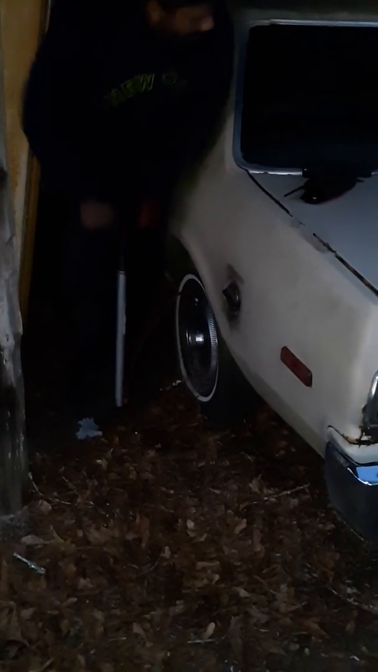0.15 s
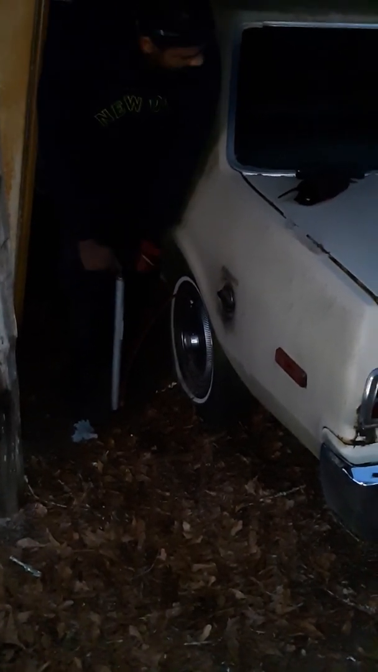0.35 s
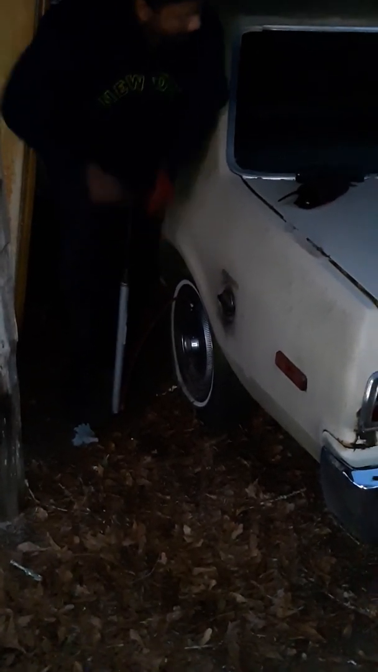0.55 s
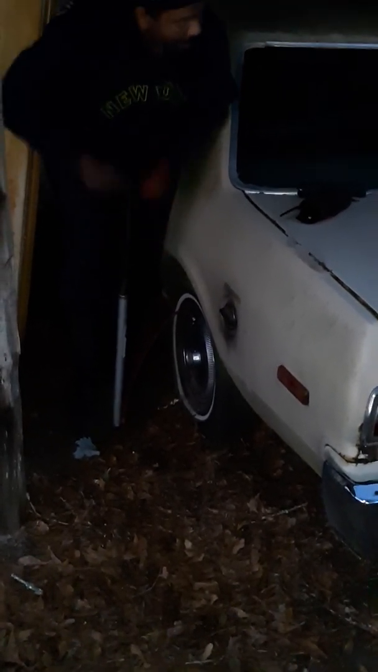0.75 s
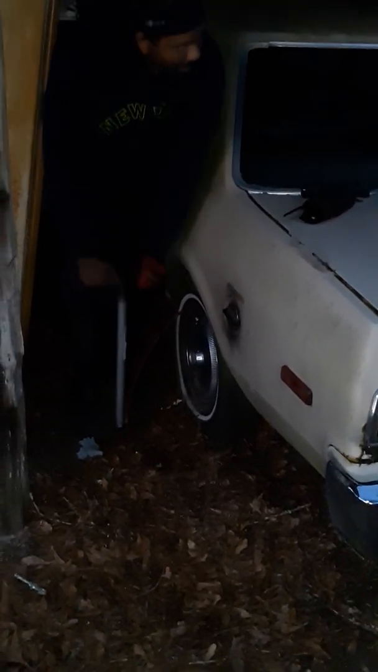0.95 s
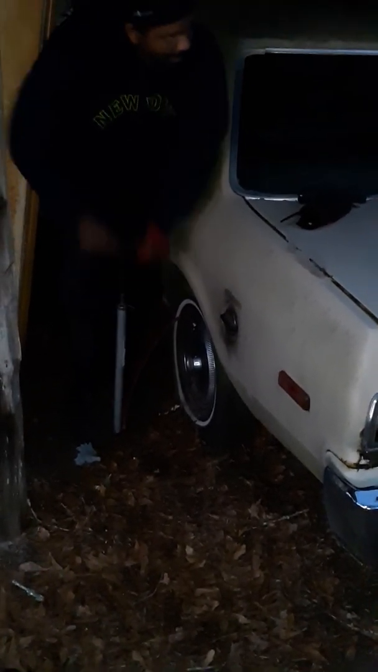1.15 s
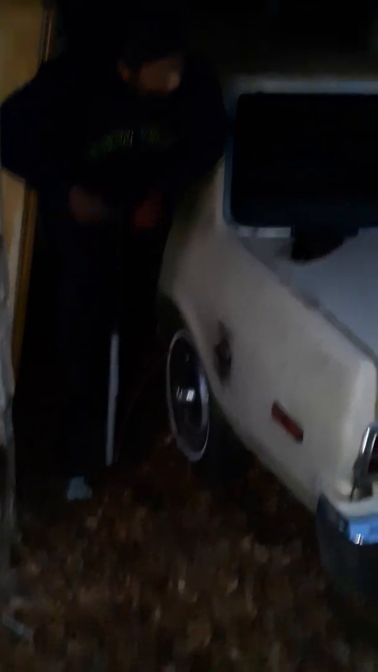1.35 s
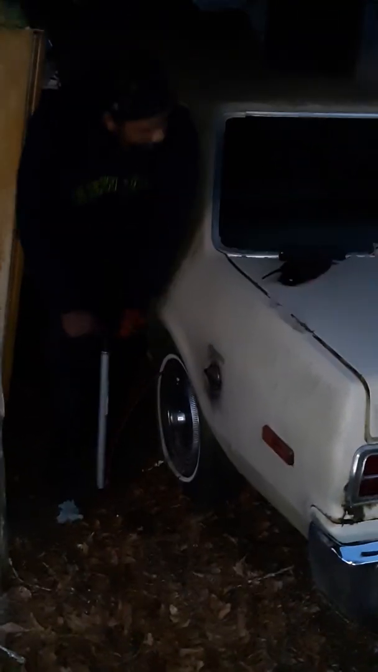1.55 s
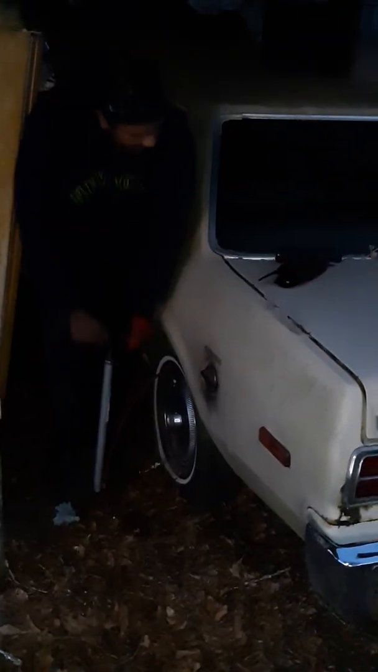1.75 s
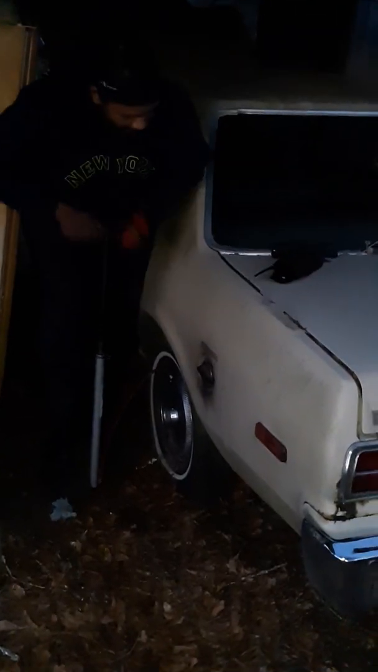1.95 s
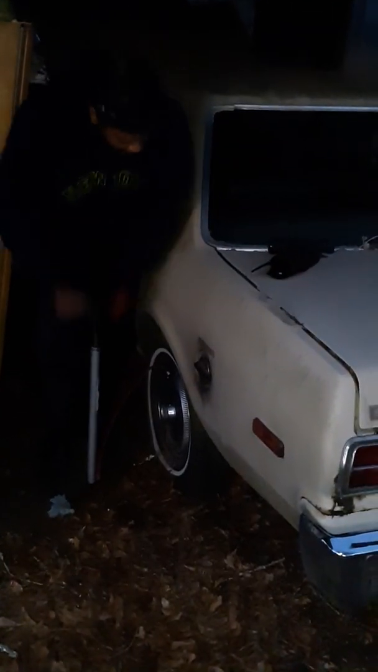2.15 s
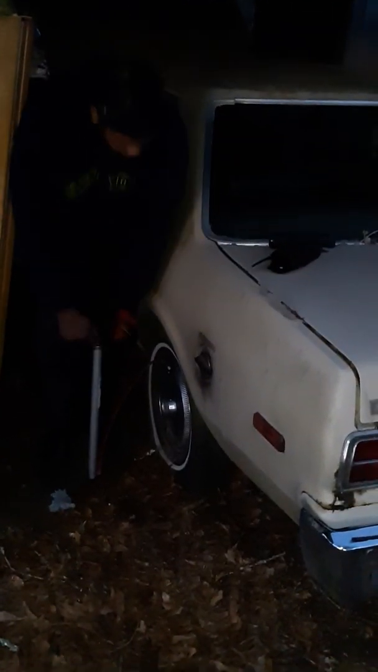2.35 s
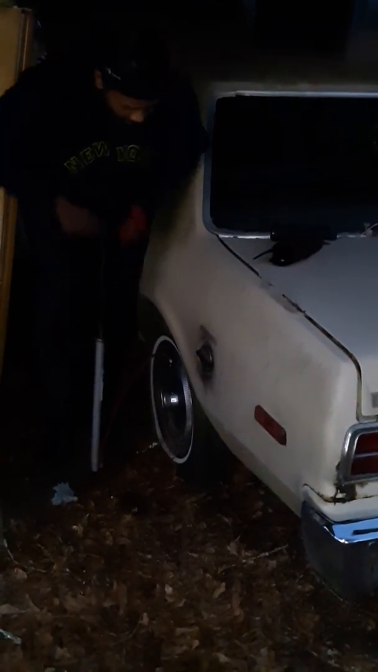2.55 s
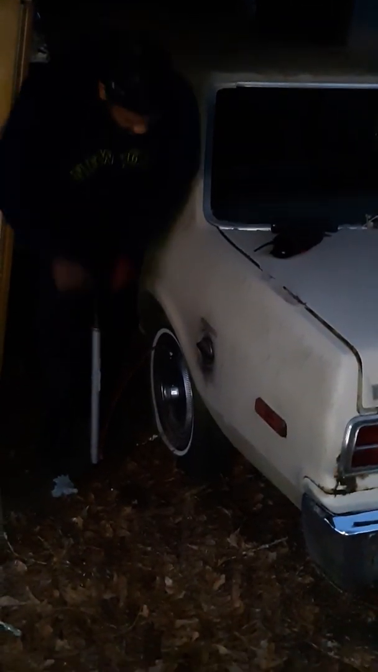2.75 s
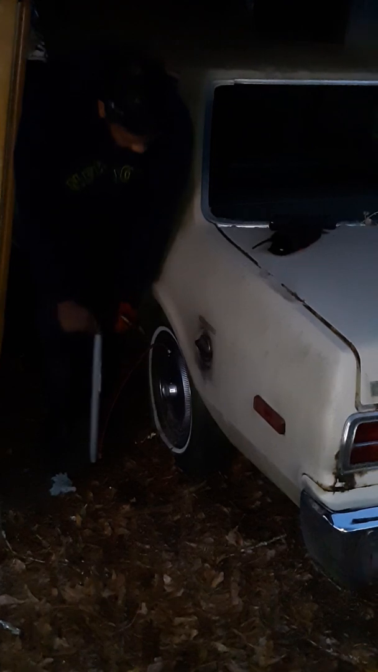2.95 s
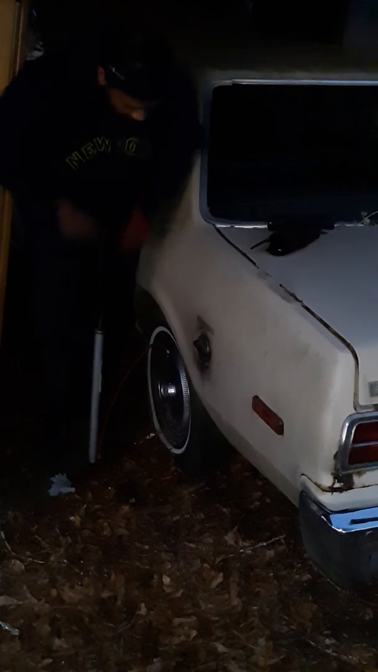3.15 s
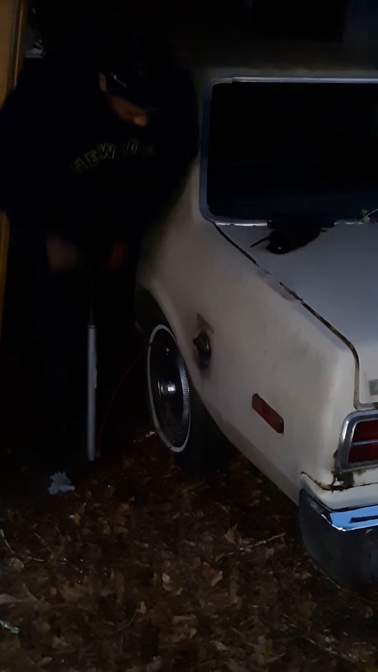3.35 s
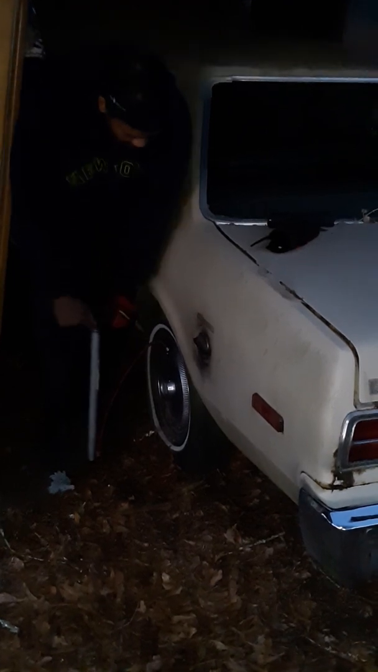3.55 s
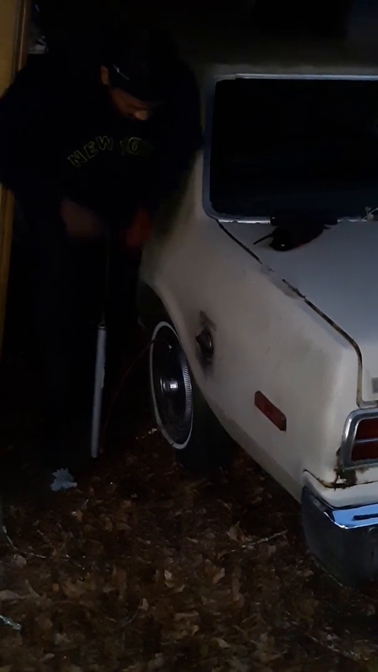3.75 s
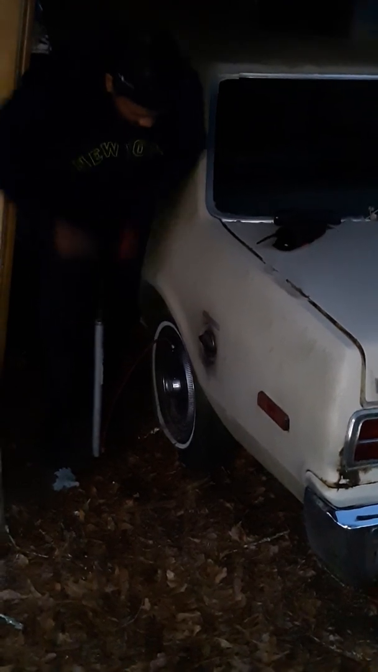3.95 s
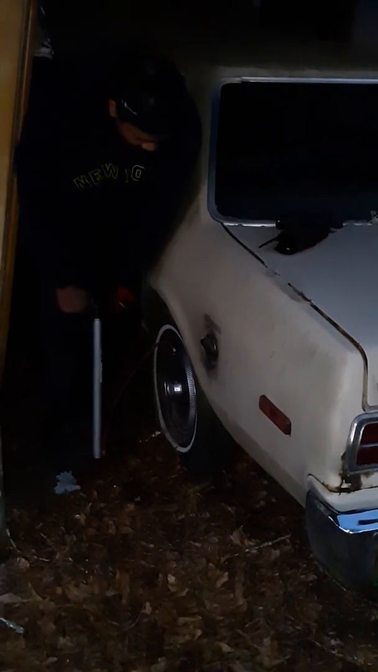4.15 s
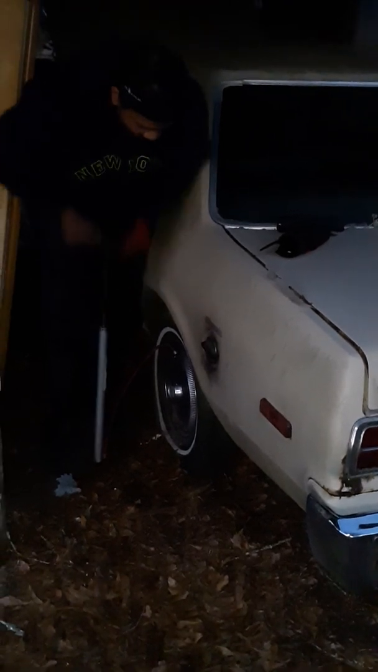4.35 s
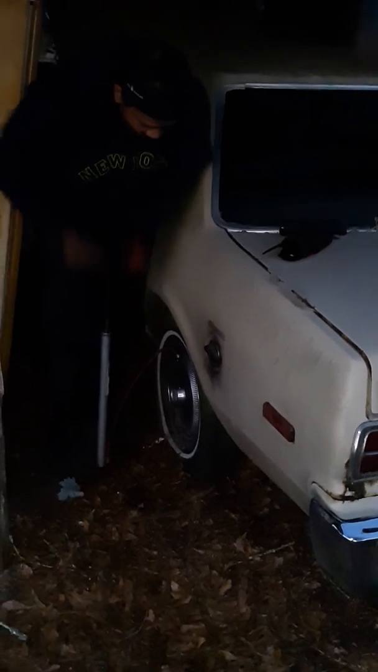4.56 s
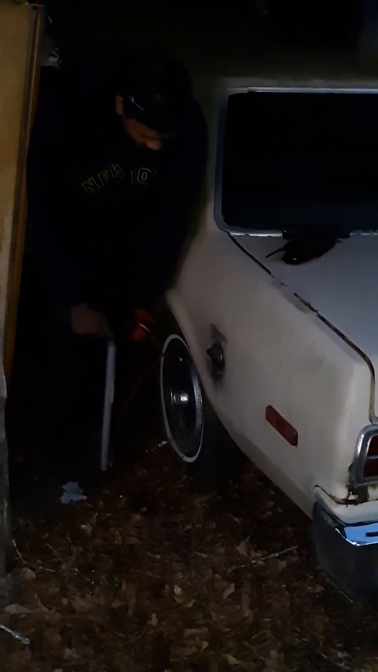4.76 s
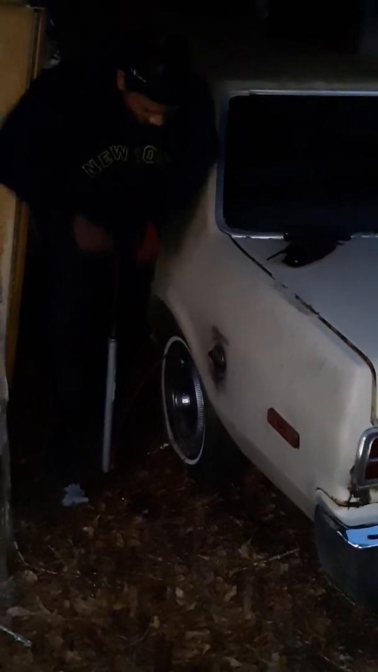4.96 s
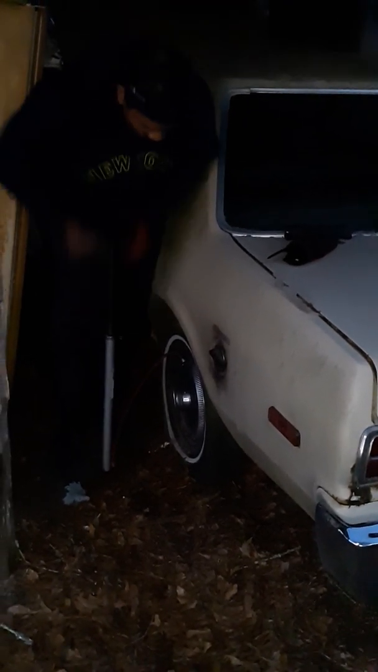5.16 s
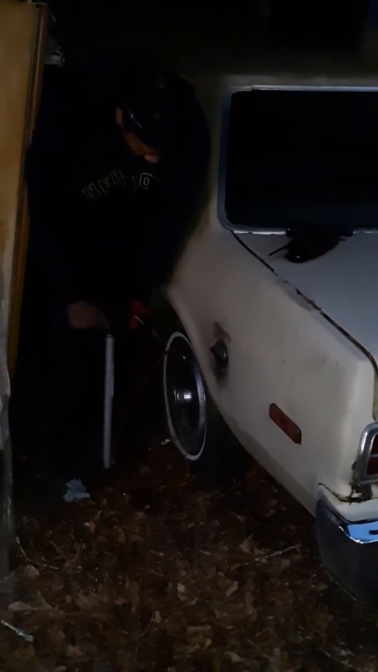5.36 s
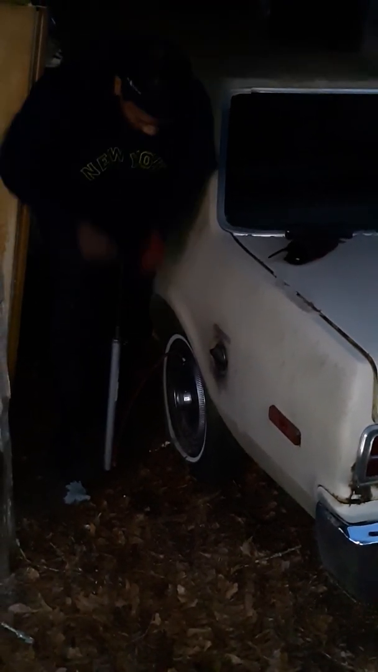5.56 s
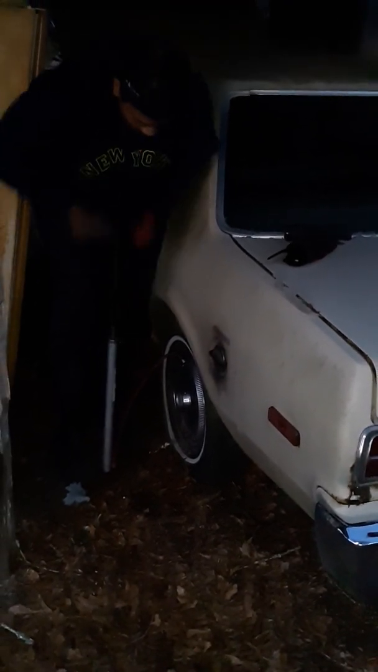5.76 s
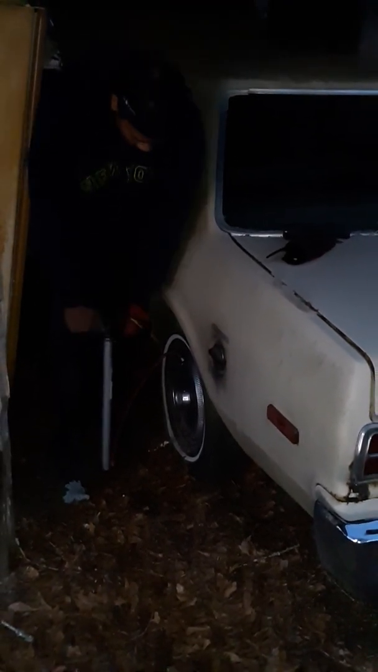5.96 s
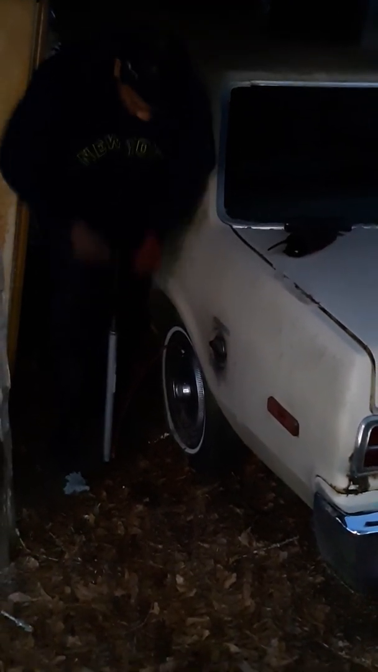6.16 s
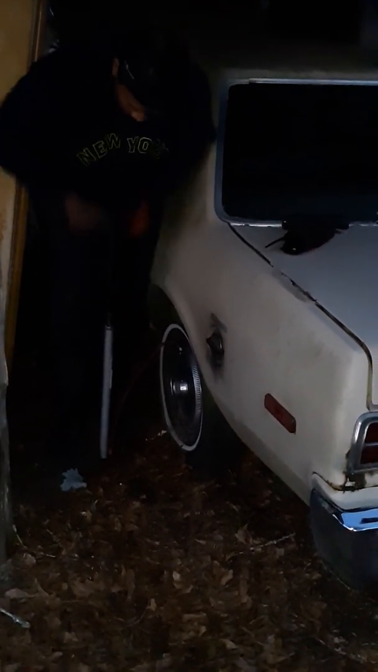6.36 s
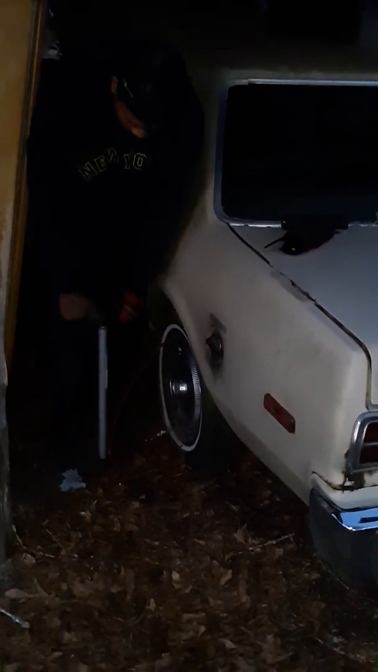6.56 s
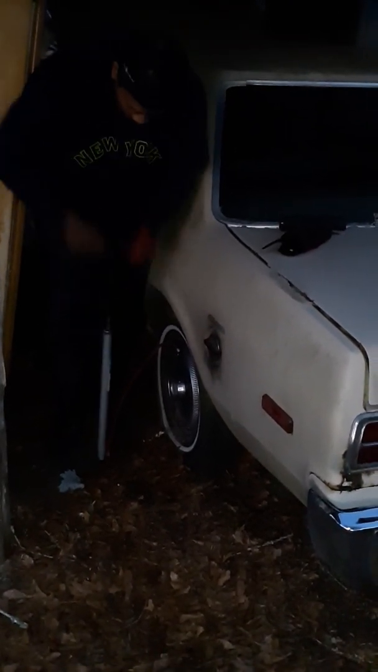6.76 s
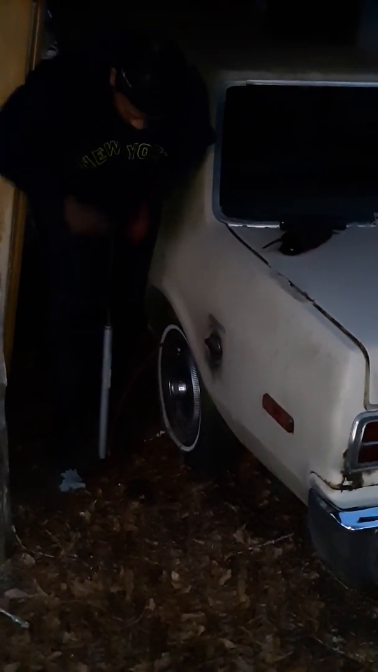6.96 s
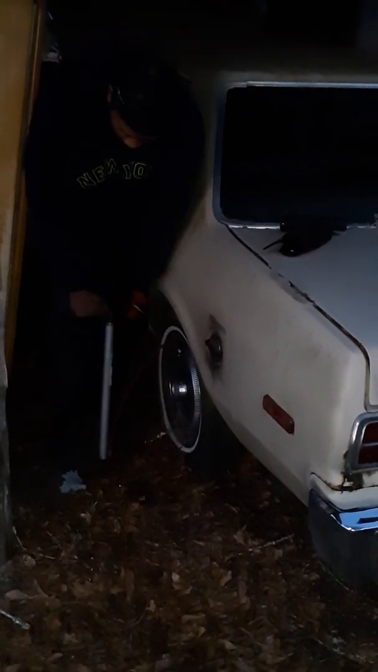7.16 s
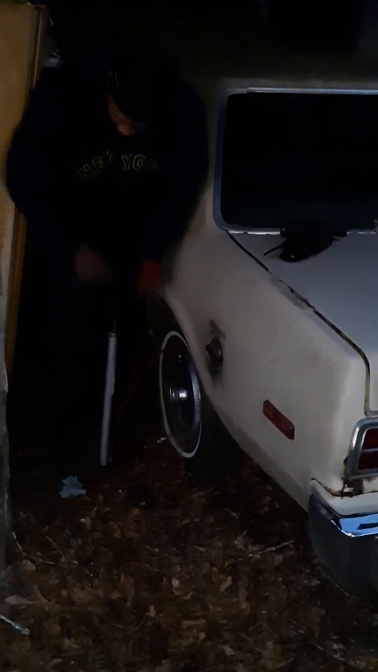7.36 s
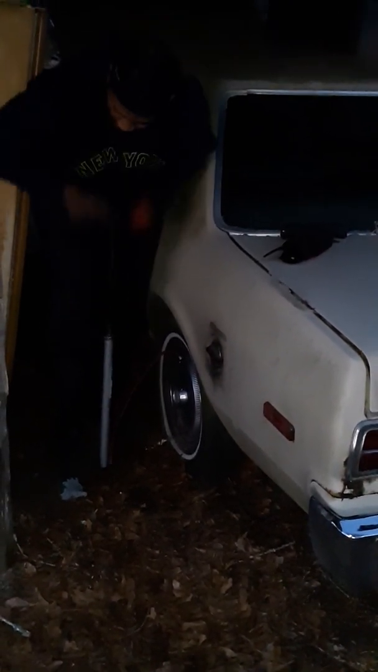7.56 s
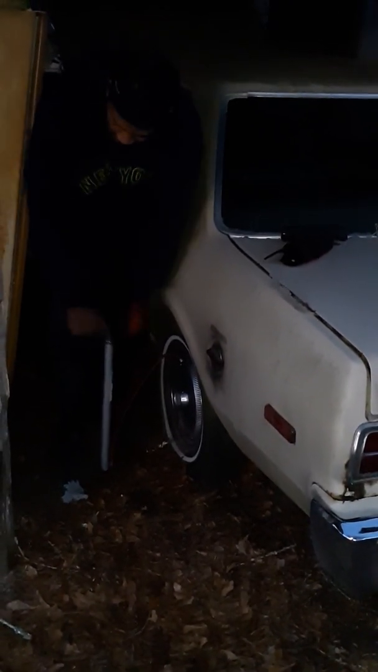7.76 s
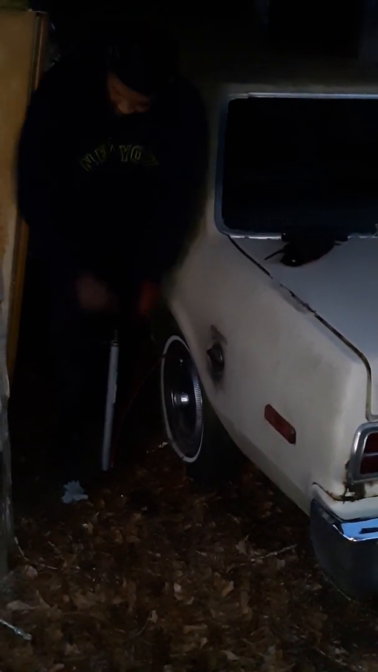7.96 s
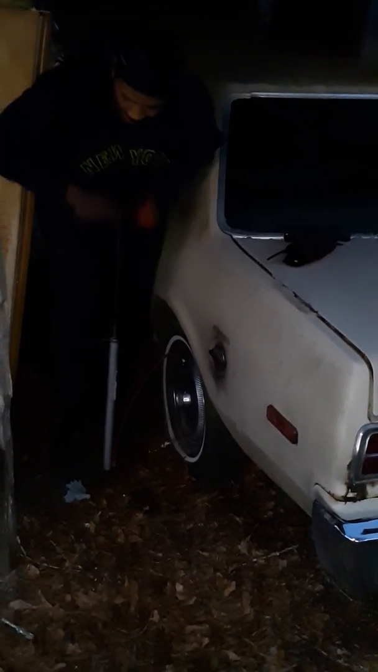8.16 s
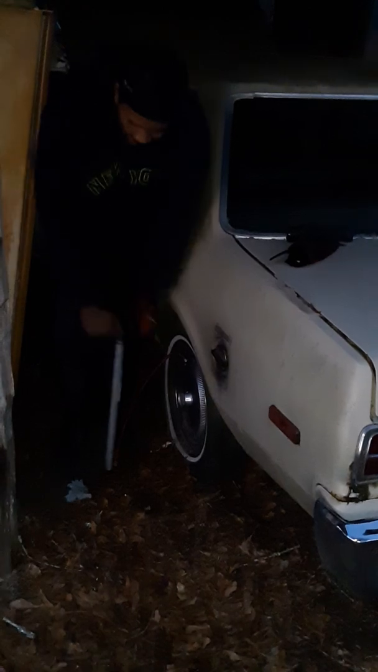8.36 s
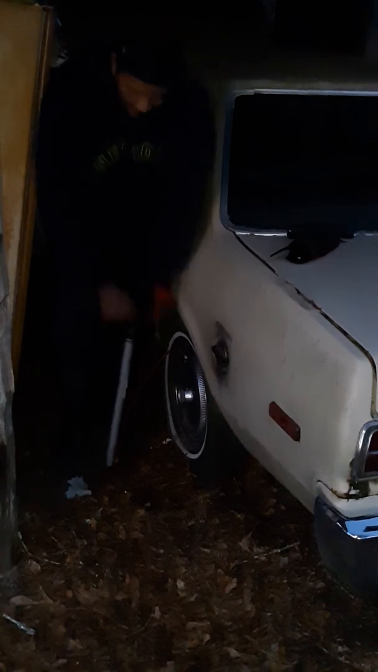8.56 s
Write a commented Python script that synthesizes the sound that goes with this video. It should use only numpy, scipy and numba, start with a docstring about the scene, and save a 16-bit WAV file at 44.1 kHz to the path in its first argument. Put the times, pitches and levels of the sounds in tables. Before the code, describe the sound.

Someone works an upright hand pump outdoors in a quiet place, about three strokes per second, pushing and pulling in turn. Pulls give a louder rough wheeze with broken chirps sliding upward; pushes are softer and slide down. Gritty steel scraping, bright ticks at the turns and loose rod clacks run throughout. Close stereo handheld microphone, faint low rumble behind.

```python
"""Upright hand pump outdoors

A hand pump is worked in steady strokes: noise rushes past the piston seal and whistles at the cap.
An echo loop as long as the air column tunes both, so the resonances rise on each pull and fall on each push.
Friction, grit and impacts ring the steel rod; fine hiss, foot bumps and a low outdoor rumble are shaped noise."""
import sys
import numpy as np
from scipy import signal
from scipy.fft import rfft, irfft
from scipy.io import wavfile
from scipy.ndimage import uniform_filter1d
from numba import njit

SR = 44100
rng = np.random.default_rng(int(sys.argv[2]) if len(sys.argv) > 2 else 0)


def wav_record(signal):
    """Record a signal, one row per channel, as 16-bit PCM in the file named by sys.argv[1]."""
    frames = np.transpose(np.atleast_2d(signal))
    bounded = np.clip(frames, -1, 1)
    # unit amplitude maps onto the largest positive 16-bit level
    quanta = np.round(bounded * 32767).astype(np.int16)
    wavfile.write(sys.argv[1], SR, quanta)


N = 379260
TIME = np.arange(N) / SR
HZ = np.fft.rfftfreq(N, 1 / SR)

# Push and pull strokes in turn, a push first; levels are ahead of each layer's trim:
# (start [s], wait before moving [s], air column at the start [m], haste [above 0: fast first, slow later],
#  air past the seal [dB], air through the cap [dB], rod scrape [dB], fine hiss [dB])
STROKES = [(0, 0.038, 0.017, 0.17, -54, -50, -46, -63.5),
           (0.321, 0.099, 0.44, 0.04, -48.5, -38, -48.5, -64.5),
           (.714, .024, .041, -0.075, -62, -45.5, -46, -65.5),
           (1.042, 0.063, 0.34, 0.11, -48, -39.5, -48, -64), (1.362, 0.021, 0.03, 0.29, -63, -47, -44, -63),
           (1.67, 0.086, 0.33, -0.11, -45.5, -37.5, -43, -65),
           (2.027, .015, 0.052, 0.7, -59, -42, -42.5, -62.5),
           (2.352, .05, 0.43, 0.12, -48.5, -40.5, -43, -59), (2.637, 0.02, 0.044, 0.28, -62, -43, -45, -63),
           (2.931, 0.023, 0.44, -0.43, -48.5, -38, -45.5, -60.5),
           (3.262, 0.017, 0.067, 0.48, -58.5, -44, -44.5, -61.5),
           (3.57, .024, 0.3, -0.24, -47.5, -37, -46, -61),
           (3.882, 0.025, 0.061, 0.48, -64, -41.5, -45.5, -59.5),
           (4.181, 0.0087, .43, -0.39, -52, -45.5, -47, -57),
           (4.492, 0.05, 0.056, 0.42, -60, -46, -42.5, -58),
           (4.78, 0, 0.44, -0.78, -46.5, -39.5, -39.5, -58.5),
           (5.062, 0.083, 0.084, 0.44, -53, -45, -44.5, -54),
           (5.38, 0.035, 0.45, 0.042, -50.5, -35.5, -44.5, -60.5),
           (5.723, .008, 0.048, -0.1, -53.5, -44, -45.5, -55.5),
           (6.018, 0.037, 0.48, 0.052, -48.5, -37, -41.5, -62.5),
           (6.328, 0.0076, .041, 0.19, -55, -46, -43, -56), (6.611, 0.022, .44, 0.11, -48, -38, -45, -64.5),
           (6.917, 0.011, 0.051, 0.078, -59.5, -56, -46.5, -57),
           (7.2, .11, 0.45, 0.33, -49.5, -38, -42, -58), (7.575, 0, 0.056, -0.14, -55, -43, -50, -56),
           (7.89, 0.046, 0.34, 0.031, -46, -35, -45, -66),
           (8.159, 0.00056, 0.13, 0.37, -54, -55, -43.5, -59),
           (8.48, 0.055, 0.32, 0.025, -59.5, -43, -54, -61)]
# Modes of rod and barrel: (frequency [Hz], width [Hz, ahead of any damping], level [dB])
STEEL = [(1366, 32, -6.5), (2077, 125, 0.5), (2202, 140, -0.5), (2653, 112, 0), (3104, 20, -3),
         (3004, 58, -5.5), (3350, 17.5, 1), (3780, 21.5, -3), (4319, 140, 1), (4496, 240, 1), (4654, 50, 8),
         (5790, 39, 7), (5916, 250, -3.5), (6814, 43.5, 7), (6885, 46, 0.5), (7700, 26, -14),
         (8300, 80, -17), (8210, 23, -9.5), (8300, 13, -26), (12350, 52, 6.5), (14240, 240, -9.5),
         (15100, 66, 6)]


def amp(db):
    """Decibels to gain."""
    return 10 ** (np.asarray(db) / 20)


def evened(x):
    """Scales to rms 1."""
    return x / np.sqrt(np.mean(x ** 2) + 1e-20)


def read(points, hz=HZ):
    """Joins (Hz, value) points on a log-frequency axis."""
    f, value = np.transpose(points)
    return np.interp(np.log(hz + 1), np.log(f + 1), value)


def add(mix, s, sound):
    """Mixes a sound in at a time in seconds."""
    part = mix[max(round(s * SR), 0):][:len(sound)]
    part += sound[:len(part)]


def colour(x, points):
    """Filters by a (Hz, dB) spectrum."""
    return irfft(rfft(x) * amp(read(points)), N)


def unit_band(x, band):
    """Scales the whole sound so that one band (Hz) has rms 1."""
    inside = irfft(rfft(x) * ((HZ > band[0]) & (HZ < band[1])), N)
    return x / np.std(inside)


def wander(rate_hz):
    """Smooth random drift of rms 1; the rate sets where its faster movement fades out."""
    coarse = TIME[::40]
    hz = np.fft.rfftfreq(len(coarse), coarse[1])
    lowpass = np.exp(-(hz / rate_hz) ** 2)
    drift = irfft(rfft(rng.standard_normal(len(coarse))) * lowpass, len(coarse))
    return np.interp(TIME, coarse, evened(drift))


def gritty(rate_hz, depth_db):
    """Noise that comes in uneven clumps."""
    return rng.standard_normal(N) * amp(depth_db * np.clip(wander(rate_hz), -2, 2))


def catches(per_s, spread_db):
    """Sparse tiny impacts of uneven size and random sign, rms 1."""
    size = amp(spread_db * np.minimum(rng.exponential(1, N), 2)) * rng.choice([-1, 1], N)
    return evened(size * (rng.random(N) < per_s / SR))


def mode(x, hz, width):
    """One resonance with gain 1 at its centre."""
    return signal.lfilter(*signal.iirpeak(min(hz, SR / 2 - 1), hz / width, SR), x)


def swells(table):
    """Bell-shaped swells as a gain at every sample."""
    return sum(amp(db) * np.exp(-((TIME - s) / half) ** 2) for s, half, db in table)


def motion():
    """The piston eases from turn to turn: stroke number, air column (m), speed 0-1, whether the handle waits."""
    # where the final stroke ends: (time [s], air column [m])
    last_turn = (8.73, 0.05)
    start, wait, column, haste = np.transpose(STROKES)[:4]
    end = np.append(start[1:], last_turn[0])
    goal = np.append(column[1:], last_turn[1])
    k = np.clip(np.searchsorted(start, TIME) - 1, 0, len(start) - 1)
    go = (start + wait)[k]
    angle = np.pi * np.clip((TIME - go) / (end[k] - go), 0, 1)
    angle = angle + haste[k] * np.sin(angle)
    position = column[k] + (goal - column)[k] * (1 - np.cos(angle)) / 2
    return k, position, abs(np.sin(angle)), TIME < go


def stroke_gain(full_db, swing_db, power, wait_db=-8, settle_s=0.067):
    """Level follows piston speed, sinking by the swing at the turns; a high power keeps it to mid-stroke."""
    k, _, speed, waiting = motion()
    db = full_db[k] - swing_db * (1 - speed ** power) + wait_db * waiting
    return amp(uniform_filter1d(db, max(int(settle_s * SR), 1), mode="nearest"))


@njit
def echo_loop(x, delay, reflection):
    """Sound runs up and down a pipe whose round trip (in samples) changes."""
    y = x.copy()
    for n in range(400, len(x)):
        at = n - delay[n]
        k = int(at)
        y[n] += reflection * (y[k] + (at - k) * (y[k + 1] - y[k]))
    return y


def barrel(x, reflection):
    """The moving piston tunes the air column in the barrel."""
    column_m = motion()[1]
    round_trip = np.clip(2 * column_m / 343 * SR, 2, 390)  # speed of sound 343 m/s
    return echo_loop(x, round_trip, reflection)


def outdoors():
    """A steady far rumble, and low shuffling close by that swells now and then, both from filtered noise."""
    # far rumble spectrum: (frequency [Hz], level [dB])
    rumble_shape = [(12, -65), (27, -42), (40, -21), (74, -4), (129, 3.5), (198, -8), (349, -11),
                    (409, -9.5), (600, -29.5), (780, -40), (1320, -120)]
    # swells of the shuffling: (centre [s], half length [s], level [dB])
    shuffle_swells = [(0.0, .06, -60), (.72, 0.13, -60.5), (1.0, 0.079, -61), (3.05, 0.13, -63),
                      (3.38, 0.2, -58), (3.85, 0.18, -61.5), (5.3, 0.25, -67), (5.86, 0.05, -58.5),
                      (6.47, 0.11, -64), (7.9, 0.71, -66.5)]
    rumble_db, shuffle_db = -63.5, -71  # the shuffling level holds between its swells
    shuffle_shape = [(80, -25), (130, 4.5), (250, 0.5), (420, -7.0), (700, -26.5), (1500, -39)]
    far = evened(colour(rng.standard_normal(N), rumble_shape))
    near = colour(gritty(rate_hz=24, depth_db=1.5), shuffle_shape)
    near = unit_band(near, (170, 450))
    return far * amp(rumble_db) + near * np.hypot(amp(shuffle_db), swells(shuffle_swells))


def bumps(rise_s=0.0005, decay_s=0.013):
    """The pump's foot rocks on leafy ground: short, dull puffs of noise, each with its own top frequency."""
    # bumps: (time [s], level ahead of the rise and decay [dB], top frequency [Hz])
    foot_bumps = [(0.123, -38, 1600), (0.677, -50, 800), (4.602, -56, 920), (5.187, -46.5, 600),
                  (5.246, -53, 600), (5.311, -42.5, 620), (5.763, -62, 694), (6.431, -49, 900)]
    # spectrum of the ground: (frequency [Hz], level [dB])
    ground_shape = [(70, -27), (150, -20), (290, 4.5), (470, 4.5), (750, -3), (1100, -4), (2000, -31)]
    t, out = np.arange(SR // 5) / SR, np.zeros(N)
    ground = colour(rng.standard_normal(N), ground_shape)
    envelope = (1 - np.exp(-t / rise_s)) * np.exp(-t / decay_s)
    for s, db, top_hz in foot_bumps:
        puff = signal.lfilter(*signal.butter(3, top_hz, fs=SR), ground[int(s * SR):][:len(t)])
        add(out, s, evened(puff) * amp(db) * envelope)
    return out


def hiss():
    """A fine, wide noise comes and goes with the strokes and swells into a rustle now and then."""
    # spectrum of the hiss: (frequency [Hz], level [dB])
    hiss_shape = [(300, -3), (600, -3.5), (1150, -4.5), (1500, 1), (3000, 2.5), (5000, 3), (6700, 9.5),
                  (7500, -1.5), (9500, -2), (11500, -0.5), (14000, 0.5), (15800, 0), (16400, -40)]
    # rustles, probably a sleeve: (centre [s], half length [s], level [dB])
    rustles = [(.2, 0.058, -59), (.89, 0.067, -64), (5.3, 0.068, -61.5), (6.97, 0.13, -57.5),
               (8.11, 0.11, -51)]
    fine = unit_band(colour(gritty(rate_hz=200, depth_db=1.5), hiss_shape), (8800, 11800))
    hiss_db = np.transpose(STROKES)[7]
    stroke_part = stroke_gain(hiss_db, swing_db=2.5, power=4.5) * amp(-1.5)
    return fine * np.hypot(stroke_part, swells(rustles))


def clacks(rise_s=0.000086, after_db=-26, after_s=0.023, dry_share=0.17, damping=0.92):
    """Chatter of the rod in its guide excites the steel modes; a faint after-rattle follows each hit."""
    # knocks in the guide, levels ahead of the band trims:
    # (time [s], chatter length ahead of the stretch [s], knock level [dB], ring level [dB])
    rod_clacks = [(0.106, 0.0054, -51, -45), (0.1204, 0.0032, -31, -31), (0.149, 0.004, -41, -40),
                  (0.221, 0.0033, -66, -47), (0.5699, 0.0028, -50, -49), (0.682, 0.0013, -47, -53),
                  (1.4018, 0.0012, -36.5, -35.5), (1.9365, 0.0057, -41, -44), (2.1528, 0.0017, -41, -36.5),
                  (2.2897, 0.0036, -45.5, -39.5), (2.4308, 0.008, -42.5, -54), (2.681, 0.003, -41.5, -35),
                  (2.967, 0.0031, -38.5, -38.5), (3.0483, 0.0053, -43.5, -43), (3.1256, 0.0037, -44, -40.5),
                  (3.163, 0.012, -38, -38.5), (3.339, 0.0048, -42.5, -41), (3.3654, 0.0038, -41, -47),
                  (3.4083, 0.0041, -42, -61), (3.5805, 0.0028, -32.5, -34.5), (3.7673, 0.0052, -36.5, -44),
                  (3.973, 0.0021, -44, -43), (4.0032, 0.0071, -34, -33.5), (4.055, 0.0032, -45, -45),
                  (4.1247, 0.0009, -41.5, -43), (4.545, 0.0038, -41, -44), (4.609, 0.012, -43.5, -46),
                  (4.644, 0.0058, -45, -40), (5.1407, 0.0053, -38.5, -30.5), (5.2136, 0.0037, -44, -54),
                  (5.3042, 0.0089, -47, -41), (5.4338, 0.003, -34.5, -29), (5.8023, 0.0023, -41, -42),
                  (5.839, 0.003, -42.5, -40), (6.1504, 0.01, -34.5, -38.5), (6.818, 0.0036, -45, -48),
                  (7.016, 0.0016, -40, -39), (7.048, 0.0035, -44, -43), (7.059, 0.0057, -37.5, -36),
                  (7.083, 0.0049, -44.5, -39), (7.315, 0.0075, -55, -48), (7.459, 0.0055, -47, -42),
                  (7.6655, 0.00075, -36, -45), (7.695, 0.0059, -35, -34), (7.7312, 0.0028, -40, -48),
                  (8.2397, 0.002, -36, -38.5), (8.2827, 0.0056, -35.5, -36), (8.299, 0.0041, -38, -40)]
    # light, bright ticks, mostly where a stroke turns: (time [s], top treble level ahead of its trim [dB])
    turn_ticks = [(1.733, -53.5), (2.9153, -43.5), (3.3055, -43.5), (3.5522, -45), (3.912, -46),
                  (4.7697, -44.5), (5.096, -42.5), (5.7, -41), (6.3175, -45), (6.921, -44.5),
                  (7.551, -38.5), (7.8012, -40), (8.168, -41.5), (8.428, -43.5)]
    clack_top_db = -16  # top treble of a clack against its ring, ahead of the trims
    tick_s, tick_knock_db, tick_ring_db = .006, -7, -2  # length; lower bands against top, ahead of stretch and trims
    hits = [(s, length, knock, ring, ring + clack_top_db) for s, length, knock, ring in rod_clacks]
    hits += [(s, tick_s, db + tick_knock_db, db + tick_ring_db, db) for s, db in turn_ticks]
    starts, length, *levels = np.transpose(hits)

    t, out = np.arange(SR // 10) / SR, np.zeros(N)
    burst = np.exp(-(t / (1.82 * length[:, None])) ** 2)
    after_rattle = amp(after_db) * np.exp(-t / after_s)
    force = (1 - np.exp(-t / rise_s)) * (burst + after_rattle)
    chatter = force * rng.standard_normal(force.shape)
    # a damping factor below 1 narrows the modes, so they ring longer
    rung = sum(amp(db) * mode(chatter, hz, width * damping) for hz, width, db in STEEL)
    rung = dry_share * chatter + rung

    # knock, ring and top treble are levelled over the first 15 ms
    edges_hz, trims_db = [(1400, 3500), (3500, 7000), (7800, 16000)], [1.2, 1.2, -.5]
    attack = int(.015 * SR)
    sounds = np.zeros_like(rung)
    for edges, db, trim_db in zip(edges_hz, levels, trims_db):
        part = signal.sosfilt(signal.butter(3, edges, "band", fs=SR, output="sos"), rung)
        sounds += part * (amp(db + trim_db) / part[:, :attack].std(1))[:, None]
    for start, sound in zip(starts, sounds):
        add(out, start, sound)
    return out


def grit(grain_s=0.0021):
    """Specks of dirt snag the moving rod: tiny dry impacts of decaying noise, loudest in mid-stroke."""
    # spectrum of the grains: (frequency [Hz], level [dB])
    grain_shape = [(900, -35), (1400, -2.5), (2200, 5), (3300, -1.5), (4500, -3), (6800, -5.5), (8000, -22),
                   (16000, -24)]
    t = np.arange(SR // 100) / SR
    snags = signal.oaconvolve(abs(catches(per_s=60, spread_db=4)), np.exp(-t / grain_s))[:N]
    grains = evened(colour(snags * rng.standard_normal(N), grain_shape))
    scrape_db = np.transpose(STROKES)[6]
    return grains * stroke_gain(scrape_db, swing_db=22, power=1.2) * amp(-3)


def scrape():
    """Friction and tiny catches ring the steel; modes swell and fade as the contact slides along the rod."""
    friction = evened(gritty(rate_hz=90, depth_db=4)) + .9 * catches(per_s=70, spread_db=5)
    swell_db = 4.4 * np.array([wander(rate_hz=16) for _ in STEEL]).clip(-1.7, 1.7)
    steel = np.zeros(N)
    for k, (hz, width, db) in enumerate(STEEL):
        polarity = (-1) ** k
        steel += polarity * amp(db + swell_db[k]) * mode(friction, hz, width)
    scrape_shape = [(700, -36), (1400, 7.5), (2700, 1), (3300, 5.5), (7000, -3.0), (7600, 2.5), (16000, -13.0)]
    steel = unit_band(colour(steel, scrape_shape), (4000, 7200))
    scrape_db = np.transpose(STROKES)[6]
    return steel * stroke_gain(scrape_db, swing_db=16.5, power=1.46) * amp(1.5)


def squeaks(half_s=0.0072, glide_hz_per_s=14000, waver_hz=142):
    """A barrel resonance makes the cap whistle: brief rough tones that glide up on a pull, down on a push."""
    # whistles: (centre [s], frequency at the centre ahead of the waver [Hz], level at the peak [dB])
    whistles = [(.935, 2100, -41), (1.463, 2050, -33), (1.535, 2470, -35), (1.845, 2105, -33.5),
                (2.21, 2050, -46), (5.545, 2320, -34), (5.585, 2292, -33), (5.622, 2317, -38),
                (6.205, 2370, -38), (6.235, 2200, -41), (6.71, 1890, -37), (6.77, 2150, -37),
                (6.815, 2300, -37), (8.05, 2220, -31)]
    t, out = np.arange(-SR // 25, SR // 25) / SR, np.zeros(N)
    starts = np.transpose(STROKES)[0]
    for s, hz, db in whistles:
        direction = (-1) ** int(np.searchsorted(starts, s))  # -1 on a push
        glide = glide_hz_per_s * direction
        waver = waver_hz * evened(uniform_filter1d(rng.standard_normal(len(t)), size=60))
        tone = np.sin(2 * np.pi * np.cumsum(hz + glide * t + waver) / SR)
        add(out, s + t[0], np.sqrt(2) * amp(db) * tone * np.exp(-(t / half_s) ** 2))
    return out


def cap():
    """The hole in the cap picks out each barrel resonance as it glides by: a run of short, broken chirps."""
    # spectrum the cap lets through: (frequency [Hz], level [dB])
    cap_shape = [(1200, -58), (1450, -22), (1780, -14.5), (2030, 4), (2180, 2), (2400, 5), (2700, -9),
                 (3000, -4.5), (3600, -20.5), (8000, -89)]
    chirps = barrel(gritty(rate_hz=70, depth_db=3.2), reflection=.7)
    flutter = amp(4.0 * wander(rate_hz=45).clip(-2, 1.5))
    chirps = unit_band(colour(chirps, cap_shape) * flutter, (1800, 2700))
    cap_db = np.transpose(STROKES)[5]
    return chirps * stroke_gain(cap_db, swing_db=23, power=0.83) * amp(-1.35)


def intake():
    """Air squeezes past the piston seal in a rough rush, mostly on the pull, coloured by the barrel."""
    # spectrum of the rush: (frequency [Hz], level [dB])
    intake_shape = [(250, -22), (480, -12.5), (720, -14.5), (910, -3.5), (1130, -10), (1240, -5.5),
                    (1370, 0), (1680, 9.5), (2200, -2.5), (2750, 5), (3300, -13.5), (7000, -12.5),
                    (8000, -36)]
    rush = barrel(gritty(rate_hz=110, depth_db=4.0), reflection=0.34)
    rush = unit_band(colour(rush, intake_shape), (750, 1600))
    seal_db = np.transpose(STROKES)[4]
    return rush * stroke_gain(seal_db, swing_db=17, power=2.2) * amp(-.5)


def sources():
    """Everything that sounds, as one spectrum."""
    background = outdoors() + bumps() + hiss()
    rod = clacks() + grit() + scrape()
    air = squeaks() + cap() + intake()
    return rfft(background + rod + air)


def scene():
    """Two microphone ports share the direct sound and take the scattered part in opposite polarity."""
    # level of left over right: (frequency [Hz], difference [dB])
    balance = [(60, -0.5), (87, -0.5), (130, -0.5), (180, -1.0), (260, -1.0), (380, -2.5), (550, -1.5),
               (790, 3.5), (1140, -0.5), (1650, -5.5), (2380, -6.5), (3440, 0.2), (4970, -2.0), (7180, 1.5),
               (10400, 0), (15000, -1.0)]
    # phase by which left leads: (frequency [Hz], lead [rad])
    phase_lead = [(200, 0), (860, 0.68), (1550, 0.75), (2150, 0.7), (2580, 1.5), (3100, 1.6), (3790, 0.48),
                  (4130, -2.5), (4480, 1.46), (5770, 0.86), (6500, 1.28)]
    # likeness of the ports: (frequency [Hz], correlation [0-1])
    likeness = [(100, .98), (700, .84), (1500, .95), (2500, .93), (5000, .84), (9000, .48), (14000, .62)]
    direct, scattered = sources(), sources()  # two independent random draws of the same events
    same = read(likeness)
    ports = []
    for side in (1, -1):  # left, right
        heard = np.sqrt((1 + same) / 2) * direct + side * np.sqrt((1 - same) / 2) * scattered
        share = np.sqrt(2 / (1 + amp(-side * read(balance)) ** 2))
        ports.append(irfft(heard * share * np.exp(.5j * side * read(phase_lead)), N))
    return np.array(ports)


def record(dry, edge_hz=16300):
    """The recorder's band limit: a steep low-pass."""
    lowpass = signal.firwin(511, edge_hz, window=("kaiser", 9), fs=SR)
    return signal.oaconvolve(dry, lowpass[None], "same")


dry = scene()
out = record(dry)
wav_record(out)
```